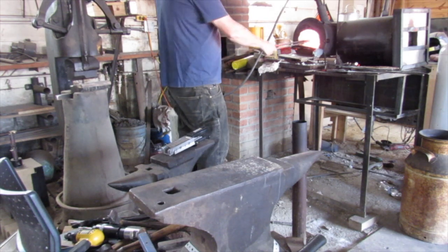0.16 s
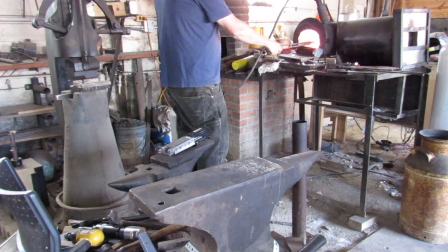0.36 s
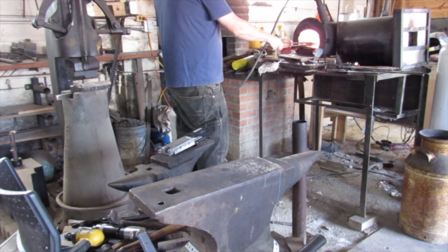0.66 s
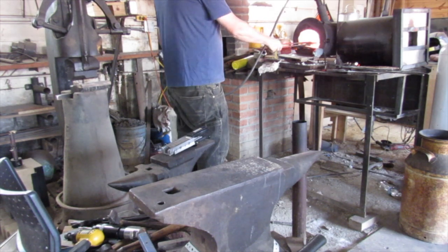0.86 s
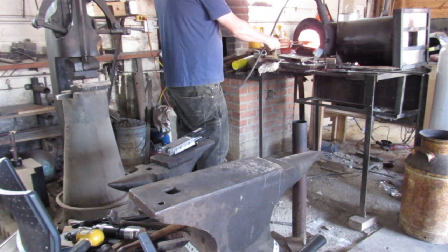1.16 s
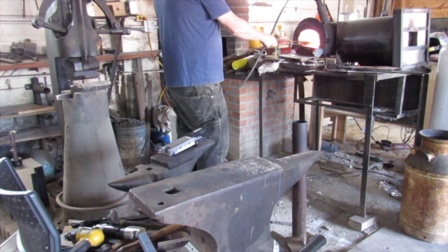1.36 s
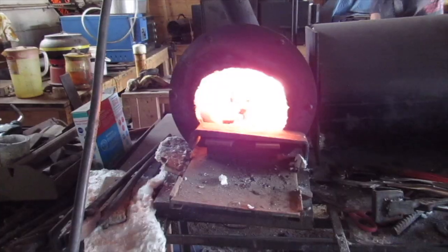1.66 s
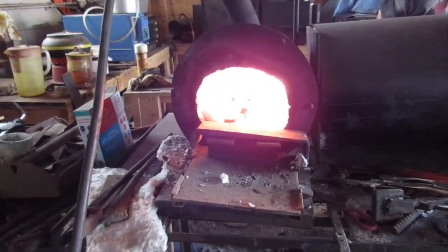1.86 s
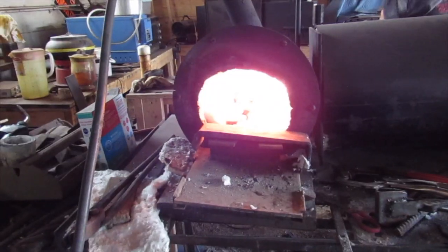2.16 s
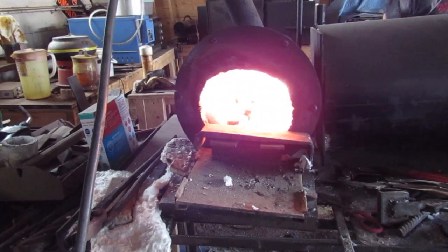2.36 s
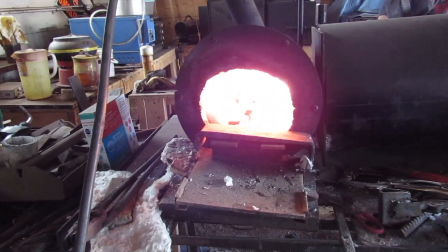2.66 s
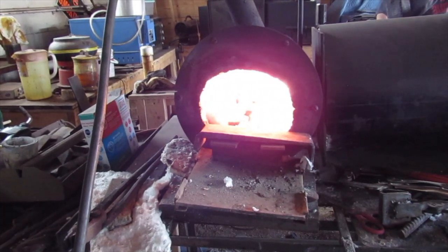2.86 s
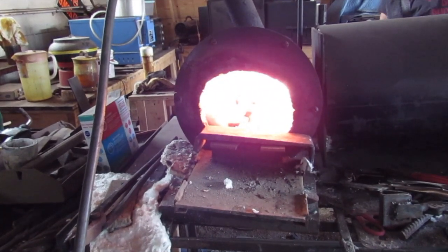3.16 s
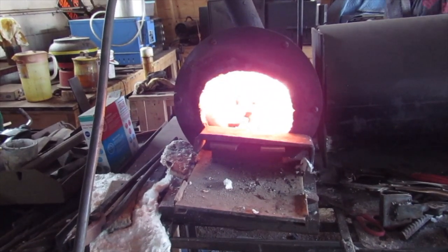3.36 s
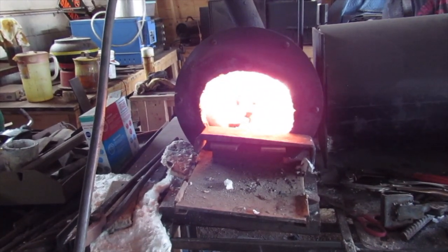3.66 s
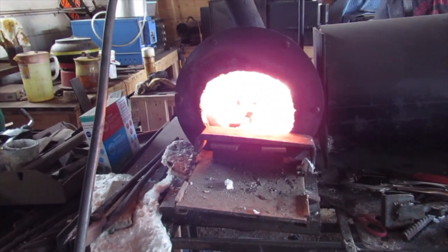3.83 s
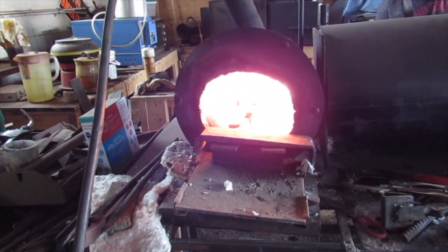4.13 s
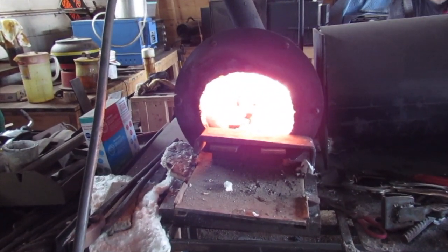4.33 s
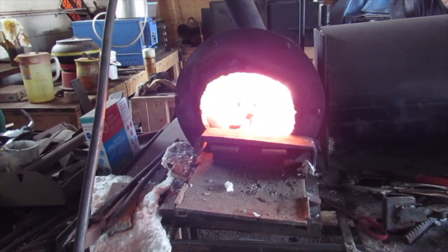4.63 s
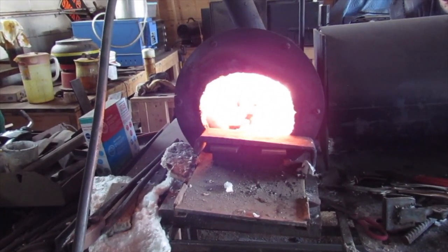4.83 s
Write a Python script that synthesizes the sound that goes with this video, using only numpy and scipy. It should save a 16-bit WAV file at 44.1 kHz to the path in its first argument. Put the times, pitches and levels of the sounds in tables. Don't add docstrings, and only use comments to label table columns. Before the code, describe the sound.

From 0 to 1.6 s a gas forge is heard across a workshop: a steady, low, slightly fluttering rumble, mostly around 100 to 350 Hz, with a softer rush near 400 Hz and a faint wide hiss. At about 0.33 s a small flame thump and tiny tick occur, then from 0.4 to 0.6 s tongs scrape and clatter, midrange and dull, with a short room tail. The sound stops dead from 1.61 to 1.77 s. It returns abruptly close up, much louder, with a clipped boom, then ducks. Dense low thuds of igniting gas crowd 1.8 to 2.5 s, strong again near 2.85, 2.95 and 3.25 s, then more scattered until 4.93 s. Thin breathy whistles around 10 kHz swell near 2.0, 2.8, 4.45 and strongest 4.75 s. Faint steel rubs or ticks come at 3.2, 3.57, 3.87 and 4.15 s. The roar continues to the end, about 5 s.

```python
import sys
import numpy as np
from scipy import signal
from scipy.fft import rfft, irfft, next_fast_len
from scipy.io import wavfile

SR = 44100
rng = np.random.default_rng(int(sys.argv[2]) if len(sys.argv) > 2 else 0)


def boost_factor(decibels):
    exponent = np.asarray(decibels, float) / 20
    return 10 ** exponent


def unload_audio(sound):
    columns = np.transpose(np.atleast_2d(sound))
    steps = np.round(np.clip(columns, -1, 1) * 32767)
    wavfile.write(sys.argv[1], SR, steps.astype(np.int16))


N = 220347
PAD = next_fast_len(N)
TIME = np.arange(N) / SR
HZ = np.maximum(np.arange(PAD // 2 + 1) * SR / PAD, 1)
BREAK_S, RESUME_S, CUT_IN_S = 1.6125, 1.7686, 0.0009


def rms_one(x):
    return x / np.sqrt(np.mean(x ** 2) + 1e-20)


def in_time(rows):
    return np.interp(TIME, *np.transpose(rows))


def at_hz(points):
    hz, db = np.transpose(points)
    return np.interp(np.log(HZ), np.log(hz), db)


def drift(rate):
    return rms_one(irfft(rfft(rng.standard_normal(PAD)) / (1 + (HZ / rate) ** 2), PAD)[:N])


def bell(peak_s, rise_s, fall_s):
    return np.exp(-0.5 * ((TIME - peak_s) / np.where(TIME < peak_s, rise_s, fall_s)) ** 2)


def shaped(drive, spectrum, modes, side):
    lift = 1 + sum((boost_factor(db) - 1) / (1 + (2 * (HZ - hz) / width) ** 2) for hz, width, db in modes)
    outside = (HZ < spectrum[0][0]) | (HZ > spectrum[-1][0])
    gain = boost_factor(at_hz(spectrum) - 40 * outside) * lift
    mid = irfft(rfft(rms_one(drive), PAD) * gain, PAD)[:N]
    diffuse = irfft(rfft(rng.standard_normal(PAD)) * gain * boost_factor(at_hz(side)), PAD)[:N]
    diffuse = diffuse * boost_factor(1.2 * drift(18))
    return np.array([mid + diffuse, mid - diffuse]) / np.std(mid)


def puffs(per_s, spread_db, smooth):
    sizes = boost_factor(spread_db * np.minimum(rng.exponential(1, N), 4)) * rng.choice([-1, 1], N)
    return rms_one(sizes * (rng.random(N) < per_s / SR)) + smooth * rng.standard_normal(N)


# frequency in Hz, level in dB per Hz.
FAR_ROAR_SPECTRUM = [(18, -56.5), (30, -33), (59, -18), (87, -10), (183, -2), (204, -0.5), (259, -1.5),
                     (312, -3.5), (333, -2.5), (400, -18.5), (520, -28), (880, -120)]
NEAR_ROAR_SPECTRUM = [(18, -54), (30, -55), (62, -16), (92, -10.5), (163, -2.5), (183, -1), (262, -2.5),
                      (295, -12.5), (329, -10), (400, -35.5), (520, -59), (880, -120)]


def roar(flutter, spectrum, modes, side):
    flame = puffs(250, spread_db=0.0, smooth=1.62) * boost_factor(0.12 * flutter)
    return shaped(flame, spectrum, modes, side)


# frequency in Hz, level in dB per Hz.
FAR_RUSH_SPECTRUM = [(240, -27), (400, -6.5), (421, -4.5), (450, -22), (556, -17.5), (675, -33),
                     (772, -26.5), (978, -25.5), (1020, -18), (1180, -29), (1280, -27), (3000, -39.5),
                     (3900, -64.5), (6600, -120)]
NEAR_RUSH_SPECTRUM = [(240, -28.5), (400, -7.5), (432, -2.5), (454, -4.5), (533, -9), (710, -26),
                      (876, -15), (1110, -24), (1270, -27.5), (1430, -27), (2090, -31), (3000, -39),
                      (3900, -74), (6600, -120)]


def rush(flutter, spectrum, modes, side):
    eddies = rng.standard_normal(N) * boost_factor(0.17 * flutter + 0.84 * drift(40))
    return shaped(eddies, spectrum, modes, side)


# frequency in Hz, level in dB per Hz.
FAR_HISS_SPECTRUM = [(1760, -39), (3000, -15), (3270, 5.5), (4290, -2), (6000, 0), (9170, -2), (9810, -3),
                     (10600, -3), (15000, -6.5)]
NEAR_HISS_SPECTRUM = [(1760, -34), (3000, -19), (3270, -1), (5280, -2.5), (6780, -0.5), (9300, -2.5),
                      (10000, 0.5), (15000, -7.5)]


def hiss(spectrum, modes, side):
    return shaped(rng.standard_normal(N), spectrum, modes, side)


# frequency in Hz, width in Hz, lift in dB.
FAR_MODES = [(99.2, 9, 7), (180, 8.3, 3), (220.3, 29, 3), (248, 6.6, 3.5), (299.6, 5.4, 10), (1040, 35, -7),
             (8260, 146, 6), (10000, 250, 7.5), (11900, 300, 6.5), (3390, 140, -6.5)]
NEAR_MODES = [(171.4, 11, 2.7), (379, 37, 4.4), (464, 29, 5), (517, 9.1, 3.7), (2056, 27, 7.8),
              (3320, 290, 3.9), (4670, 38, 3), (10100, 66, 4.3), (930, 11, 1.1), (1091, 27, 7),
              (8350, 230, 3.5), (6930, 110, 1.3)]
# frequency in Hz, side minus mid in dB.
FAR_SIDE = [(60, -22), (110, -27.5), (200, -23), (380, -21.5), (700, -11.5), (1280, -15.5), (2370, -20.5),
            (4370, -18), (6500, -13.5), (8070, -7.5), (14900, -2)]
NEAR_SIDE = [(60, -22.5), (110, -31.5), (200, -31), (380, -14), (700, -21), (1280, -12), (2370, -26.5),
             (4370, -13.5), (6500, -14.5), (8070, -6.5), (14900, -1)]
# time in seconds,
# level in dB.
FAR_GAIN = [(0.02, -83), (0.4, -83.5), (0.58, -85.5), (0.9, -83.5), (1.6, -82.5)]
NEAR_GAIN = [(1.77, -63.5), (1.84, -76), (2.02, -73.5), (2.15, -76.5), (2.26, -79), (2.82, -73.5),
             (2.93, -77.5), (3.38, -78), (3.87, -74.5), (4.0, -77.5), (4.35, -76.5), (4.56, -75),
             (4.99, -73.5)]
# roar, rush and hiss, each in dB.
FAR_OVER_DB = (42.5, 28.5, 16.5)
NEAR_OVER_DB = (47.5, 30, 12)


def forge(gain, over_db, roar_spectrum, rush_spectrum, hiss_spectrum, modes, side):
    mean_db = -68
    swing_db = in_time(gain) - mean_db
    roar_gain = boost_factor(mean_db + over_db[0] + 0.51 * swing_db)
    rush_gain = boost_factor(mean_db + over_db[1] + 0.81 * swing_db)
    hiss_gain = boost_factor(mean_db + over_db[2] + swing_db)
    flutter = drift(35)
    low = roar_gain * roar(flutter, roar_spectrum, modes, side)
    middle = rush_gain * rush(flutter, rush_spectrum, modes, side)
    high = hiss_gain * hiss(hiss_spectrum, modes, side)
    return low + middle + high + sizzle(side)


# start in seconds, peak level in dB, ring frequency in Hz.
IGNITIONS = [(.328, -24.5, 252), (1.769, -3.5, 166), (1.78, -8, 225), (1.805, -5, 169), (1.968, -11.5, 164),
             (1.99, -14, 242), (2.015, -6.5, 257), (2.089, -7.5, 258), (2.128, -5.5, 188),
             (2.172, -9.5, 195), (2.211, -6, 184), (2.277, -10.5, 186), (2.345, -10, 160),
             (2.388, -10, 194), (2.517, -10.5, 214), (2.851, -7.5, 215), (2.956, -6.5, 190),
             (3.173, -14, 180), (3.245, -6.5, 182), (3.439, -16, 168), (3.5, -28, 238), (3.914, -9, 211),
             (4.023, -10.5, 180), (4.292, -12, 173), (4.414, -11, 203), (4.466, -12, 247),
             (4.658, -12.5, 181), (4.723, -13, 180), (4.862, -12.5, 136), (4.932, -7, 189)]


def booms():
    out = np.zeros(N)
    age = TIME[:int(0.08 * SR)]
    swell = (1 - np.exp(-age / 0.0028)) ** 3 * np.exp(-age / 0.0065)
    for start_s, db, hz in IGNITIONS:
        ring = boost_factor(db + 5.5) * swell * np.sin(2 * np.pi * hz * age)
        at = int((start_s + 0.00097) * SR)
        out[at:at + len(ring)] += ring[:N - at]
    return out


# start in seconds, frequency in Hz, level in dB, T60 in seconds.
STEEL_TICKS = [(.338, 3780, -69, .2), (.336, 2500, -68, .1), (3.57, 2050, -65, .6), (3.83, 4150, -67, .4),
               (3.865, 4350, -71, .25), (3.87, 1700, -65, .4), (4.122, 5400, -70, .3),
               (4.14, 5330, -72, .2), (4.125, 8700, -72, .12), (4.145, 8750, -65, .14),
               (4.12, 1600, -65, .4), (4.14, 2750, -66, .15), (4.14, 6100, -70, .1)]


def clink():
    grit = boost_factor(2.5 * drift(120))
    ticks = np.zeros(N)
    for start_s, hz, db, t60_s in STEEL_TICKS:
        age = np.maximum(TIME - start_s, 0)
        envelope = boost_factor(db - 60 * age / t60_s) * np.tanh(age / 0.0026)
        ticks += envelope * np.sin(2 * np.pi * hz * age)
    return grit * ticks


# start in seconds, level in dB.
SCRAPES = [(.403, -45), (.415, -35), (.426, -35), (0.444, -36), (.462, -39), (.478, -41.5), (.495, -42.5),
           (.515, -42.5), (.54, -43.5), (.575, -56), (.62, -57)]
# frequency in Hz, level in dB per Hz.
TONGS_SPECTRUM = [(380, -6.5), (460, -3.5), (560, -6), (680, -21), (800, -9), (1070, -3.5), (1360, -9),
                  (1600, -8.5), (2680, -24.5), (4530, -33), (10900, -42.5), (14000, -50)]
# frequency in Hz, width in Hz, lift in dB.
TONGS_MODES = [(843, 50, 6), (1037, 21, 7), (1143, 21, -2), (1300, 42, -4), (1580, 60, 0.5),
               (1600, 50, 1.5)]


def tongs():
    rattle_t60_s, shop_t60_s = 0.11, 0.73
    direct_power, tail_power = np.zeros(N), np.zeros(N)
    for start_s, db in SCRAPES:
        age = np.maximum(TIME - start_s, 0)
        direct_power += boost_factor(2 * (db - 60 * age / rattle_t60_s)) * (1 - np.exp(-age / 0.002))
        tail_power += boost_factor(2 * (db - 9.5 - 60 * age / shop_t60_s)) * (1 - np.exp(-age / 0.013))
    wide = [(hz, db + 2.5) for hz, db in FAR_SIDE]
    duller = [(hz, db - 1.1 * np.log2(hz / 700)) for hz, db in TONGS_SPECTRUM]
    rattle = shaped(puffs(1200, spread_db=0.5, smooth=0.46), TONGS_SPECTRUM, TONGS_MODES, wide)
    echo = shaped(rng.standard_normal(N), duller, TONGS_MODES, wide)
    return np.sqrt(direct_power) * rattle + np.sqrt(tail_power) * echo


# frequency in Hz, level in dB per Hz.
SIZZLE_SPECTRUM = [(8300, -31), (9300, -22), (9800, -9), (10400, -11), (11200, -14), (12000, -31)]
# peak time in seconds, level in dB, rise in seconds, fall in seconds.
SIZZLE_SWELLS = [
    (2.02, -69.5, .08, .12),
    (2.5, -73, 0.089, 0.088),
    (2.65, -72, 0.053, 0.064),
    (2.81, -67, .06, 0.074),
    (3.87, -72, .15, 0.034),
    (4.17, -73, 0.044, 0.035),
    (4.44, -66, 0.048, .07),
    (4.76, -64, .07, 0.058),
]


def sizzle(side):
    swells = sum(db_gain * bell(peak_s, rise_s, fall_s) for peak_s, db_gain, rise_s, fall_s in
                 [(peak_s, boost_factor(db), rise_s, fall_s) for peak_s, db, rise_s, fall_s in SIZZLE_SWELLS])
    narrow = [(hz, db - 10.0) for hz, db in side]
    return swells * shaped(rng.standard_normal(N) * boost_factor(1.7 * drift(30)), SIZZLE_SPECTRUM, [], narrow)


# peak time in seconds, level in dB, half length in seconds.
RUB_STROKES = [
    (3.2, -68, 0.046),
    (3.87, -63, 0.042),
    (4.153, -61.5, .03),
]
# frequency in Hz, level in dB per Hz.
RUB_SPECTRUM = [(1200, 1), (1700, 4), (2800, -6.5), (4200, -12), (6500, -17), (9000, -24)]


def rubs():
    stroke = sum(boost_factor(db) * bell(peak_s, half_s, half_s) for peak_s, db, half_s in RUB_STROKES)
    return stroke * shaped(puffs(2500, spread_db=6.5, smooth=0.6), RUB_SPECTRUM, [], NEAR_SIDE)


def scene():
    far = forge(FAR_GAIN, FAR_OVER_DB, FAR_ROAR_SPECTRUM, FAR_RUSH_SPECTRUM, FAR_HISS_SPECTRUM,
                FAR_MODES, FAR_SIDE) + tongs()
    near = forge(NEAR_GAIN, NEAR_OVER_DB, NEAR_ROAR_SPECTRUM, NEAR_RUSH_SPECTRUM, NEAR_HISS_SPECTRUM,
                 NEAR_MODES, NEAR_SIDE)
    fade_out = np.clip((BREAK_S - TIME) / 0.0056, 0, 1)
    fade_in = np.clip((TIME - RESUME_S) / CUT_IN_S, 0, 1)
    return far * fade_out + near * fade_in + booms() + clink() + rubs()


def low_pass(x):
    return signal.sosfilt(signal.butter(12, 15490, fs=SR, output="sos"), x)


def record(dry):
    ceiling = 0.32
    age = np.maximum(TIME - RESUME_S, 0)
    start_gain = boost_factor(0.25 * np.exp(-age / 0.015) * (TIME > RESUME_S))
    drive = dry * start_gain / ceiling
    clipped = ceiling * drive / (1 + drive ** 8) ** (1 / 8)
    return low_pass(clipped)


dry = scene()
out = record(dry)
unload_audio(out)
```